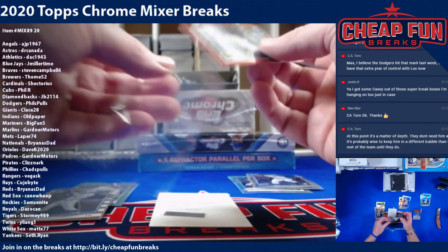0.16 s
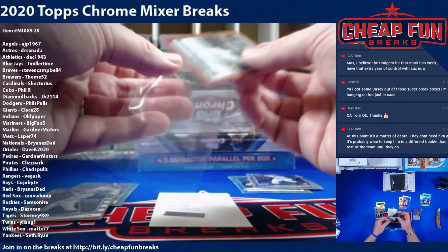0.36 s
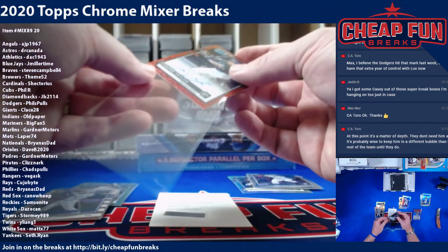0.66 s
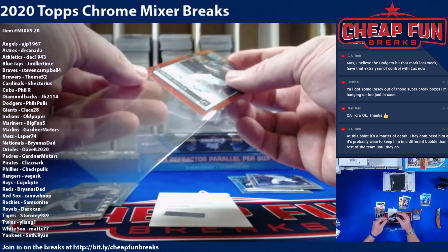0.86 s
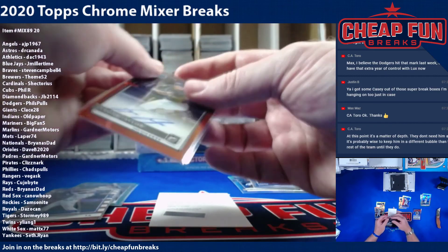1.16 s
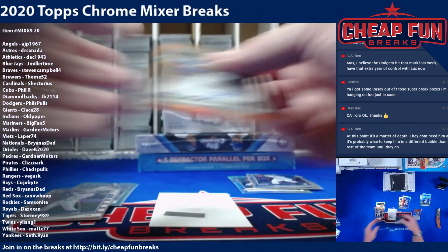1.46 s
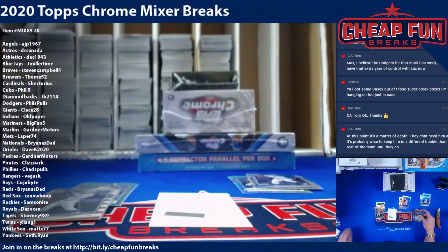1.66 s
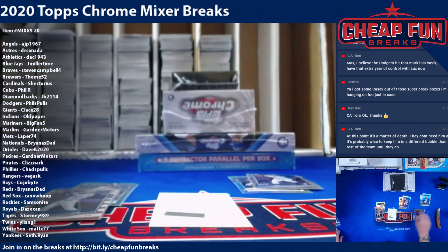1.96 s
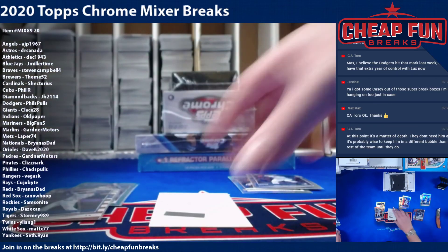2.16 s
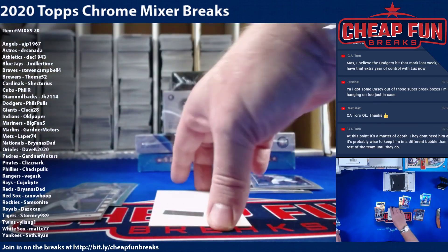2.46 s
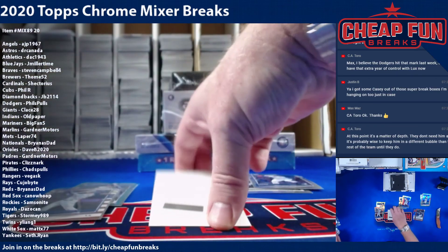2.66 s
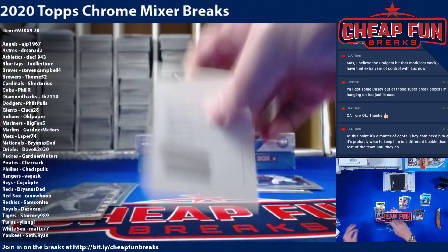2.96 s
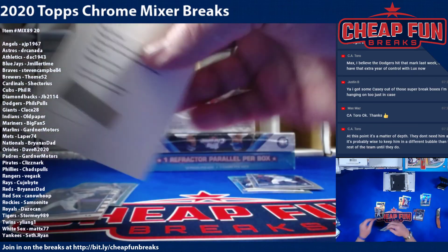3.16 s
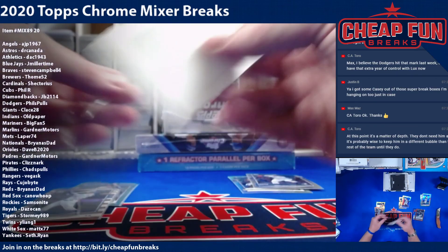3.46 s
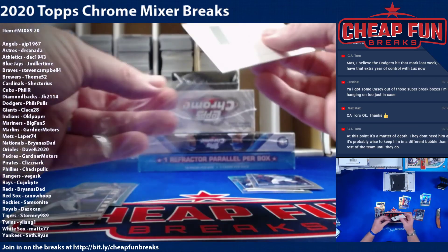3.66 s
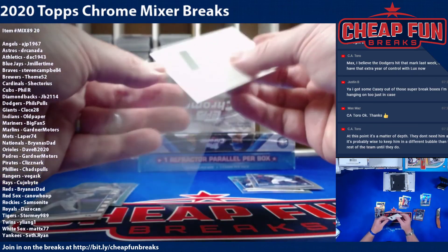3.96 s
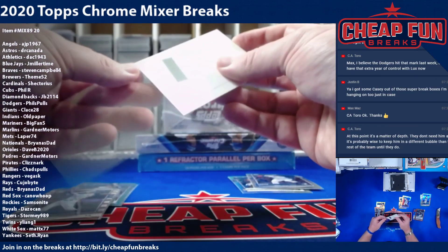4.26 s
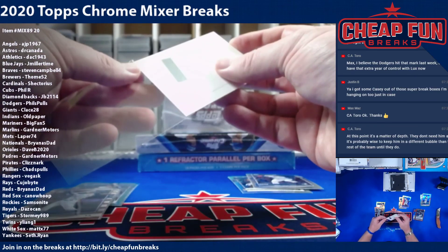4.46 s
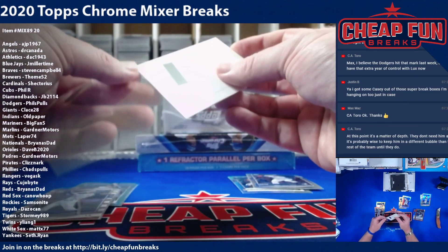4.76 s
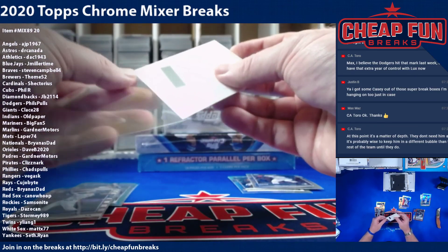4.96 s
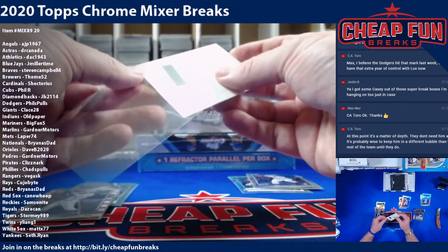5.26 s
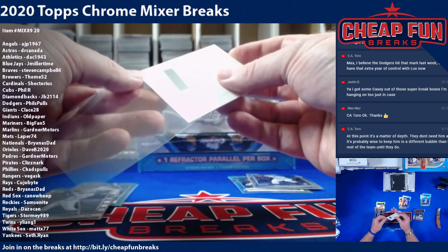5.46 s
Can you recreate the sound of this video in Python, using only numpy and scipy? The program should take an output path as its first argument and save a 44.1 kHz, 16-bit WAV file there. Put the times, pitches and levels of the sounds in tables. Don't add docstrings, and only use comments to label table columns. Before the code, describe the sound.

Hands handle trading cards and a clear plastic sleeve close to a desk microphone in a small room. Faint rubs come first, then a busy cluster of crisp snaps and taps on the table, two soft deep table bumps among lighter rustles, a sparse quiet stretch, and one sharp final click. A low motor hum, air rumble and faint hiss continue throughout.

```python
import sys
import numpy as np
from scipy import signal
from scipy.fft import rfft, irfft, next_fast_len
from scipy.io import wavfile
from scipy.ndimage import uniform_filter1d

SR = 44100
rng = np.random.default_rng(int(sys.argv[2]) if len(sys.argv) > 2 else 0)


def to_wav(sig):
    pcm = np.clip(np.atleast_2d(sig), -1, 1) * 32767
    pcm = np.round(pcm).astype(np.int16)
    wavfile.write(sys.argv[1], SR, pcm.T)


def boost(x):
    u = np.asarray(x, float) / 20
    return 10 ** u


N = 246871

# time in seconds, peak level in dB,
# card ring in Hz, film crack in dB relative to the card.
EDGE_SLIPS = [(0.036, -60, 2480, -1), (0.4915, -56.5, 4500, 1), (1.0838, -37, 3770, 1.5),
              (1.0858, -44.5, 2160, 3), (1.1692, -54, 2760, 2), (1.1786, -53, 4130, -4),
              (1.3226, -46, 2530, -5), (1.3323, -41.5, 3870, 8.5), (1.444, -54, 2330, -9),
              (1.8115, -41.5, 1960, -14), (2.307, -58, 3220, -10), (2.3263, -44.5, 3350, -25),
              (2.45, -61, 1190, -10), (2.5286, -54, 2110, -10), (2.67, -62, 2140, -2),
              (2.846, -53, 1910, -15), (2.9132, -53, 1300, 0), (3.197, -46, 1880, -2),
              (3.86, -66, 4740, 11), (4.09, -56, 2300, -13), (4.2667, -55, 1420, -12),
              (4.271, -54, 2850, -11), (4.892, -64, 4590, 8.5), (5.0812, -33, 2360, 2)]
# time in seconds, peak level in dB, card ring in Hz, film crack in dB.
CARD_TAPS = [
    (1.7116, -52, 1380, -7),
    (1.826, -53.5, 2150, -8),
    (2.5796, -52, 1200, -18),
    (2.859, -52, 3470, 1),
    (3.192, -55, 5630, 3),
]
# time in seconds, peak level in dB, card ring in Hz, film crack in dB.
CORNER_KNOCKS = [
    (1.3075, -61.5, 7500, 22),
    (1.3285, -42.5, 4300, 3),
    (1.7571, -37.5, 1800, -8),
    (2.89, -57, 3580, -7),
    (5.0768, -55, 3500, -11),
    (5.0808, -39.5, 2620, -18),
]
# start, strongest and end in seconds,
# level in dB, centre in Hz.
STROKES = [(0, .06, .15, -71.5, 3980), (0.815, 1.08, 1.09, -62, 11000), (1.205, 1.284, 1.30, -68, 4900),
           (1.276, 1.303, 1.33, -58, 4250), (1.367, 1.424, 1.46, -59.5, 3950),
           (1.774, 1.787, 1.81, -56, 3650), (1.784, 1.818, 1.818, -57, 7500),
           (2.61, 2.672, 2.70, -71, 4930), (3.05, 3.08, 3.12, -75, 5000), (3.179, 3.2, 3.29, -63, 6650),
           (3.264, 3.345, 3.44, -64, 4140), (3.35, 3.405, 3.45, -64, 4250), (3.43, 3.597, 3.82, -74, 3300),
           (3.97, 4.017, 4.06, -72.5, 3230), (4.87, 4.905, 5.0, -67, 6900)]
# start in seconds, length in seconds, level in dB, centre in Hz.
GRIP_RUBS = [(.343, 0.035, -70, 7500), (.40, .04, -71, 7000), (.472, .04, -69, 5500),
             (1.325, 0.042, -56, 8500), (2.33, 0.066, -73, 3800), (2.438, .03, -70.5, 2500),
             (2.52, 0.052, -68, 3000), (2.565, 0.046, -70.5, 4200), (2.859, 0.0059, -57, 2380),
             (2.905, 0.026, -64.5, 5500), (3.85, 0.035, -65, 6900), (4.012, 0.028, -64.5, 3080),
             (4.195, .04, -72, 2500), (4.255, 0.033, -62, 2150), (4.53, 0.031, -67, 3580)]
# start in seconds, length in seconds, level in dB, mode in Hz.
MODE_RUBS = [(.565, .045, -77, 1300), (1.35, 0.066, -72, 2340), (1.395, 0.05, -63, 2250),
             (1.437, 0.019, -63, 2300), (2.3265, 0.0046, -51.5, 1160), (2.41, .02, -73, 3700),
             (2.447, .014, -68.5, 1220), (2.528, .017, -70, 2120), (2.574, 0.013, -68.5, 1224),
             (2.913, 0.019, -68, 2720), (4.266, 0.017, -56, 2800), (5.0808, 0.0064, -45.5, 2760),
             (5.0808, 0.0067, -50, 2202), (2.859, 0.009, -65, 6300), (2.912, 0.01, -66, 6300),
             (3.197, 0.011, -61, 1880)]
# time in seconds, mode in Hz, level in dB, T60 in seconds.
TABLE_ROCKS = [
    (2.281, 25, -32, .25),
    (2.283, 46.5, -27.5, .5),
    (3.268, 92, -35, .09),
    (3.272, 42, -26.5, .25),
]
# time in seconds, mode in Hz, level in dB, T60 in seconds.
TOP_THUDS = [
    (1.7098, 326, -41, .015),
    (1.756, 328, -44.5, 0.013),
    (1.7575, 810, -47.5, 0.015),
    (2.333, 217, -54, .068),
    (2.859, 505, -43, 0.016),
    (3.98, 423, -55, 0.044),
]
# frequency in Hz, level in dB.
MOTOR_TONES = [(29.47, -44.1), (45.8, -53), (58.28, -47.1), (96.78, -58.6), (98.29, -64), (137.42, -67)]
# centre in Hz, width in Hz, level in dB.
ROOM_MODES = [(13.6, 13.5, -44), (49.5, 2.9, -50.5), (69, 2.8, -60), (85.1, 2.7, -54.5), (145.5, 3.2, -68)]
# frequency in Hz, level in dB per Hz.
AIR_SPECTRUM = [(10, -71.5), (30, -70), (60, -74), (110, -78), (200, -86.5), (300, -99), (600, -103),
                (1000, -109), (1700, -112), (4000, -112), (9000, -113), (15000, -114)]
# delay in seconds, level in dB.
WALL_ECHOES = [(.0092, -14), (.019, -29)]
SHELF_DELAYS = np.array([0, 23, 51, 90])

STROKE_OCTAVES, RUB_OCTAVES, MODE_OCTAVES = 1.9, 1.8, 0.17
RUB_RISE_SHARE = 0.4
MOTOR_IN_STEP_S, MOTOR_WANDER_SHARE = 0.457, 0.0003
TAIL_T60_S, TAIL_DB = 0.14, -8
WALL_LO_HZ, WALL_TOP_HZ = 1290, 8900
TREBLE_TOP_HZ = 15850


def crest(x):
    return x / abs(x).max()


def unit(x):
    return x / np.sqrt(np.mean(x ** 2))


def bandpass(x, lo_hz, hi_hz, order=2):
    return signal.sosfilt(signal.butter(order, [lo_hz, hi_hz], "band", fs=SR, output="sos"), x)


def decay(t_s, t60_s):
    return np.exp(-np.log(1000) * t_s / t60_s)


def walk(rate_hz):
    hold = int(SR / rate_hz)
    steps = np.repeat(rng.standard_normal(N // hold + 1), hold)
    return 1.2 * uniform_filter1d(uniform_filter1d(steps, hold), hold)[:N]


def contact(length_s, ring_hz, ring_share, thud_db, film_db):
    size = 2048
    fade = np.exp(-np.arange(size) / SR / length_s)
    spectrum = rfft(rng.standard_normal(size) * fade)
    even = irfft(spectrum / uniform_filter1d(abs(spectrum), size=30))
    burst = even * np.sqrt(fade * (1 - fade ** 3))
    edge = bandpass(burst, 1000, 6500)
    card = bandpass(burst, ring_hz / 1.2, ring_hz * 1.2)
    body = crest(edge) + ring_share * crest(card)
    thud = bandpass(burst, 350, 1400)
    film = bandpass(burst, 5000, 10500, order=1)
    return crest(body) + boost(thud_db) * crest(thud) + boost(film_db) * crest(film)


def ticks():
    out = np.zeros(N + 2048)
    # rows, table thud in dB, card ring share, burst length in seconds
    kinds = [(EDGE_SLIPS, -11, 0.35, 0.0031), (CARD_TAPS, 1, 0.54, 0.003), (CORNER_KNOCKS, -1.5, 0.45, 0.0007)]
    for rows, thud_db, ring_share, length_s in kinds:
        for time_s, level_db, ring_hz, film_db in rows:
            i = int(time_s * SR)
            out[i:i + 2048] += boost(level_db) * contact(length_s, ring_hz, ring_share, thud_db, film_db)
    return out[:N]


def brief_strokes(rows, octaves):
    return [(start_s, start_s + RUB_RISE_SHARE * length_s, start_s + length_s, level_db, hz, octaves)
            for start_s, length_s, level_db, hz in rows]


def slides():
    out = np.zeros(N)
    slip_db = 2.3 * rng.exponential(size=N) + 2.6 * walk(300)
    slips = rng.standard_normal(N) * boost(slip_db)
    strokes = [(*row, STROKE_OCTAVES) for row in STROKES]
    strokes += brief_strokes(GRIP_RUBS, RUB_OCTAVES) + brief_strokes(MODE_RUBS, MODE_OCTAVES)
    for k, (start_s, peak_s, end_s, level_db, hz, octaves) in enumerate(strokes):
        i = np.arange(int(start_s * SR), int(end_s * SR))
        pressure = np.interp(i / SR, [start_s, peak_s, end_s], [0, 1, 0]) ** 0.83
        spread = 2 ** (octaves / 2)
        order = 2 if octaves < 0.3 else 1
        grain = np.roll(slips, 997 * k)[i]
        rub = bandpass(grain, hz / spread, min(hz * spread, 0.45 * SR), order)
        out[i] += boost(level_db) * pressure * unit(rub)
    return out


def thumps():
    out = np.zeros(N)
    for time_s, hz, level_db, t60_s in TABLE_ROCKS + TOP_THUDS:
        t_s = np.clip(np.arange(N) / SR - time_s, 0, None)
        onset = 1 - np.exp(-t_s * hz * 3.9)
        out += boost(level_db) * onset * decay(t_s, t60_s) * np.sin(2 * np.pi * hz * t_s)
    return out


def motor():
    drift_s = np.cumsum(MOTOR_WANDER_SHARE * walk(2.2)) / SR
    t_s = np.arange(N) / SR - MOTOR_IN_STEP_S + drift_s
    return sum(np.sqrt(2) * boost(db) * np.sin(2 * np.pi * hz * t_s) for hz, db in MOTOR_TONES)


def air():
    size = next_fast_len(N)
    hz = np.arange(size // 2 + 1) * SR / size + 0.0077
    knot_hz, knot_db = np.transpose(AIR_SPECTRUM)
    power = boost(np.interp(np.log(hz), np.log(knot_hz), knot_db)) ** 2
    for centre_hz, width_hz, db in ROOM_MODES:
        detuning = 2 * (hz - centre_hz) / width_hz
        power += boost(db) ** 2 * 2 / (np.pi * width_hz) / (1 + detuning ** 2) ** 1.26
    noise = irfft(rfft(rng.standard_normal(size)) * np.sqrt(power * SR / 2), size)[:N]
    return noise * boost(0.5 * walk(3.16))


def room(x):
    t_s = np.arange(int(0.3 * SR)) / SR
    tail = rng.standard_normal(len(t_s)) * decay(t_s, TAIL_T60_S) * (1 - np.exp(-t_s / 0.0017))
    response = boost(TAIL_DB) * tail / np.sqrt(np.sum(tail ** 2))
    for delay_s, db in WALL_ECHOES:
        response[int(delay_s * SR) + SHELF_DELAYS] += boost(db) * np.array([0.75, -0.5, 0.35, 0.25])
    reflected = signal.fftconvolve(x, response)[:N]
    return x + bandpass(reflected, WALL_LO_HZ, WALL_TOP_HZ, order=1)


def scene():
    hands = room(ticks() + slides())
    return (hands + thumps() + motor() + air())[None]


def top_cut(x):
    return signal.sosfilt(signal.butter(12, 16750, fs=SR, output="sos"), x)


def record(dry):
    shelf = signal.ellip(8, 0.1, 24, TREBLE_TOP_HZ, fs=SR, output="sos")
    return top_cut(signal.sosfilt(shelf, dry))


dry = scene()
out = record(dry)
to_wav(out)
```